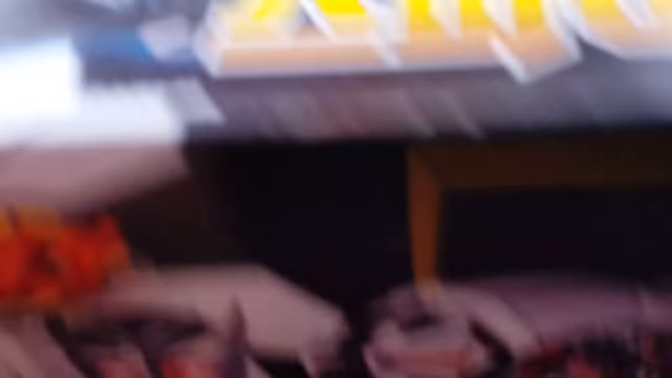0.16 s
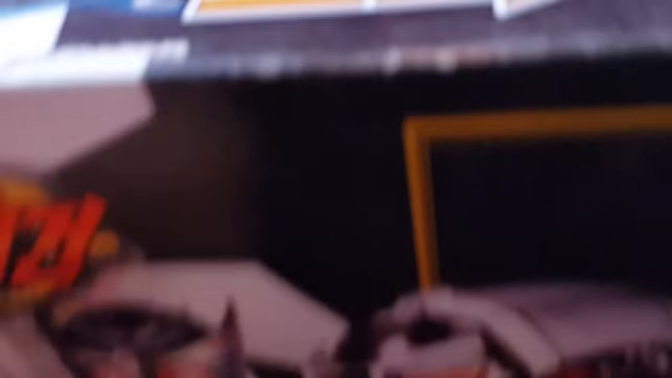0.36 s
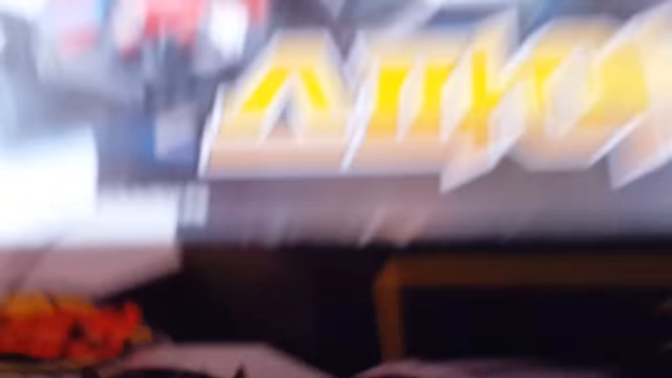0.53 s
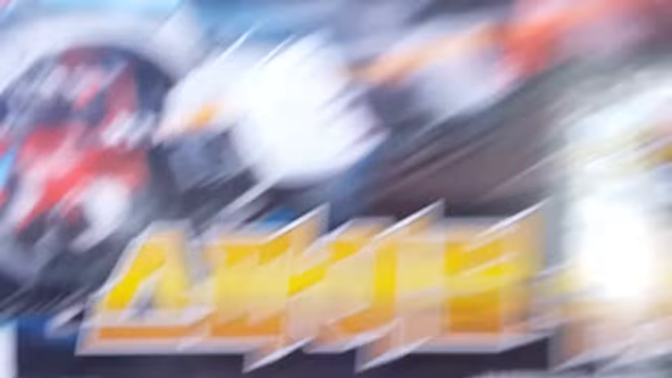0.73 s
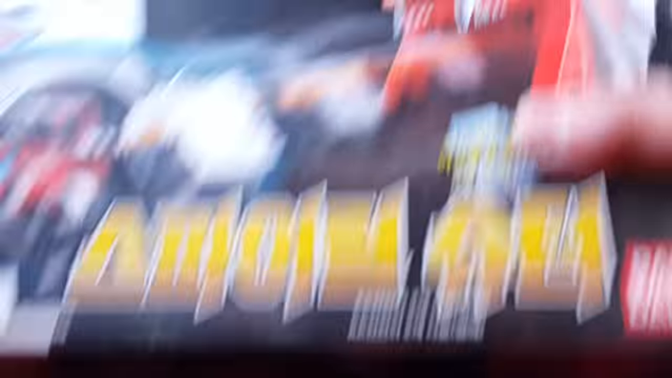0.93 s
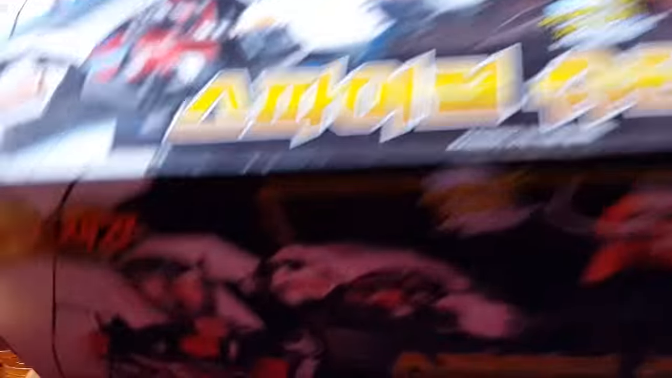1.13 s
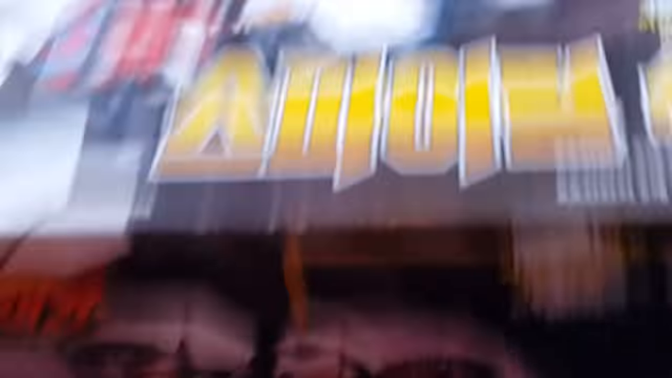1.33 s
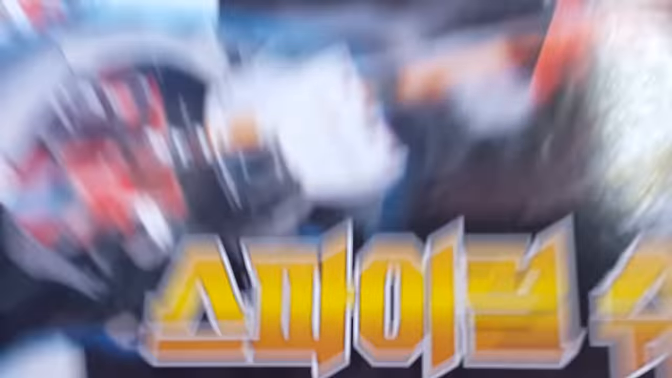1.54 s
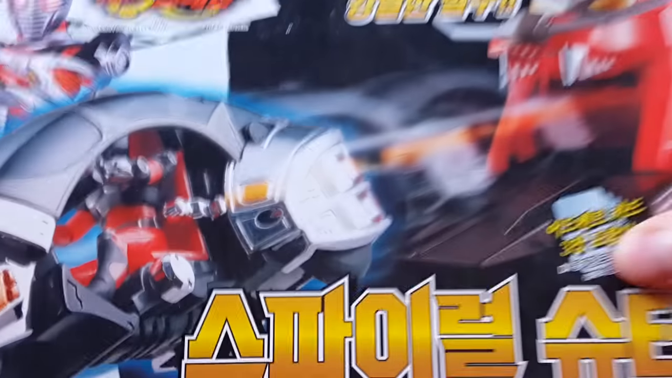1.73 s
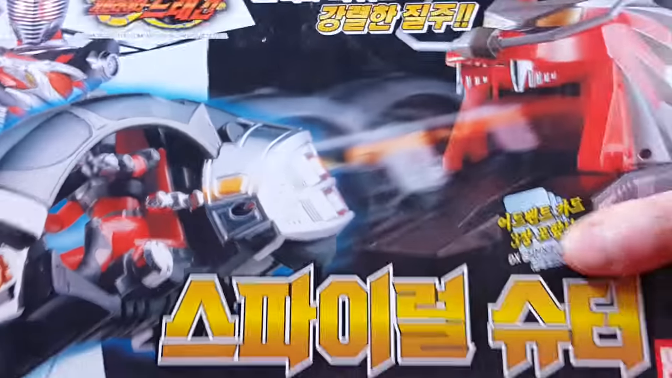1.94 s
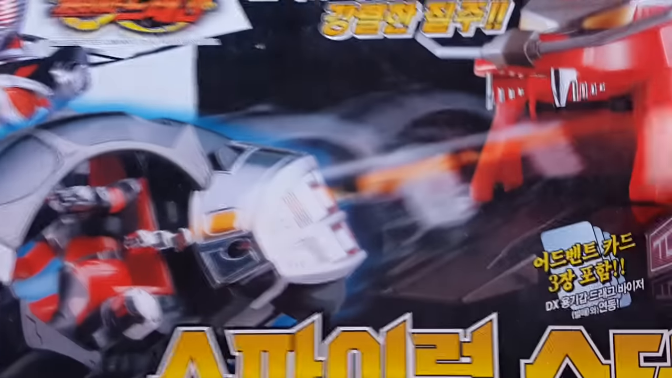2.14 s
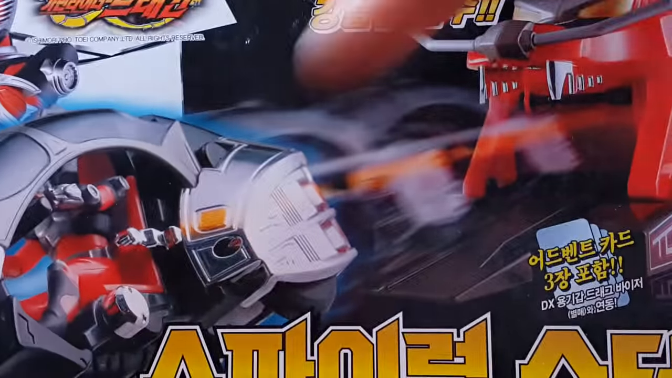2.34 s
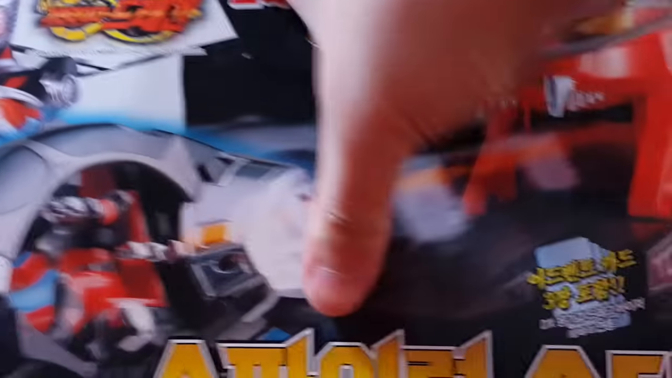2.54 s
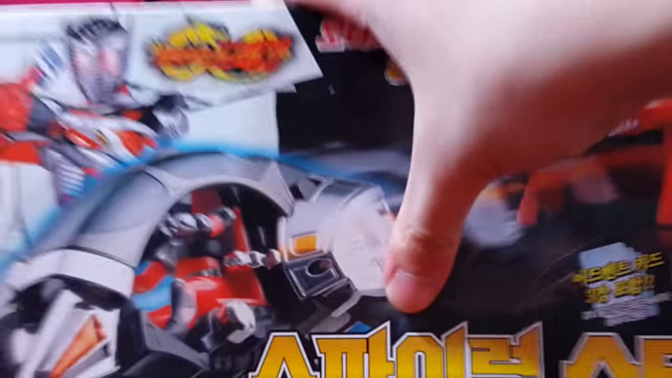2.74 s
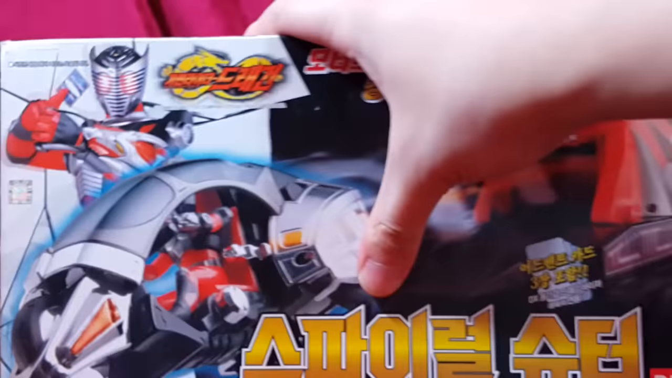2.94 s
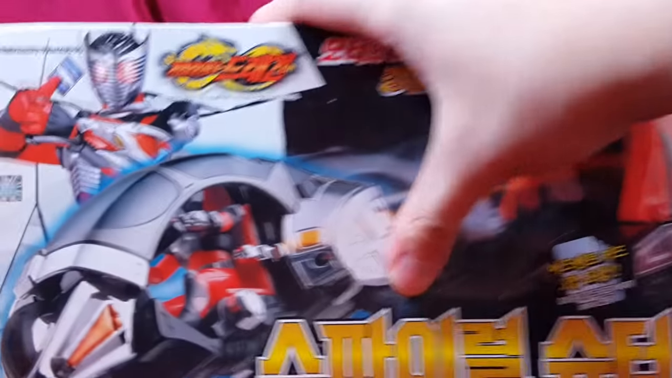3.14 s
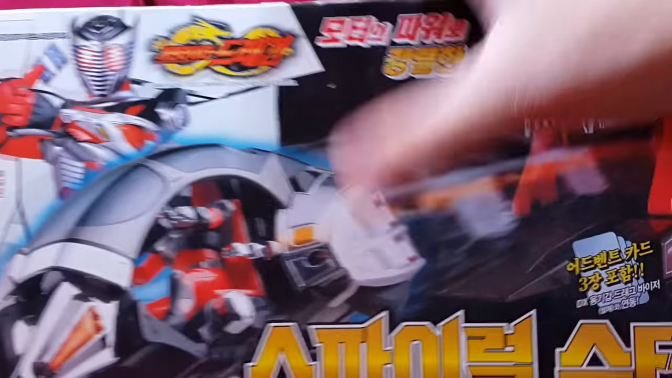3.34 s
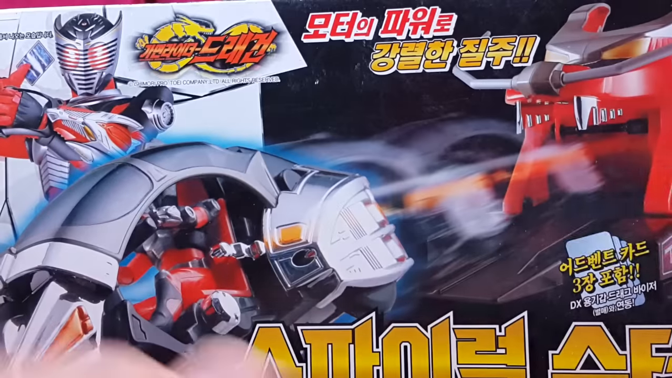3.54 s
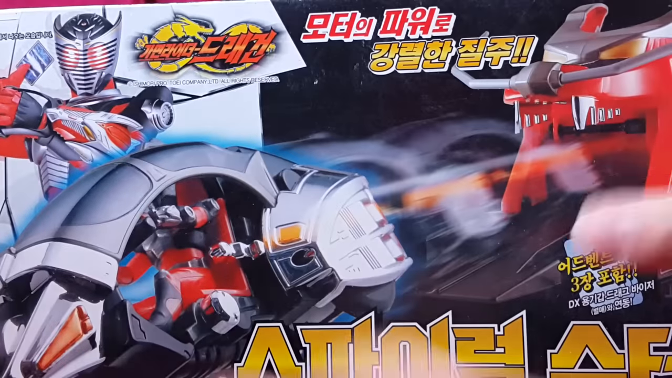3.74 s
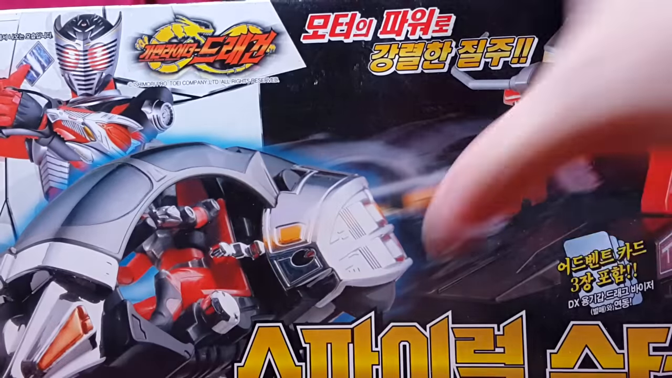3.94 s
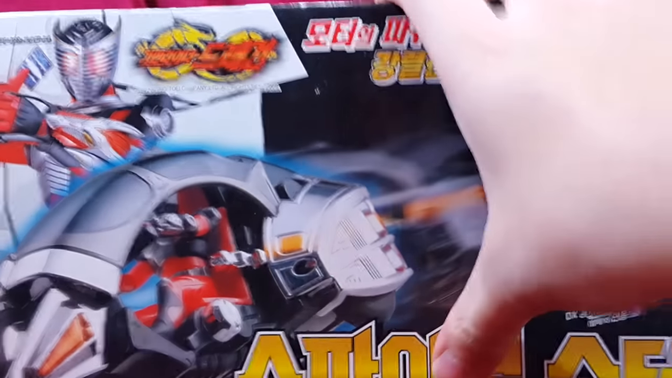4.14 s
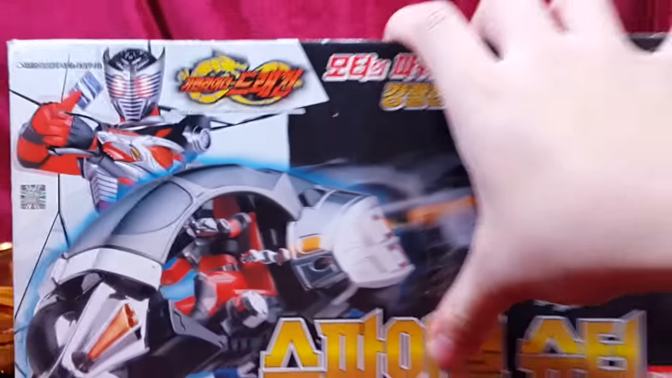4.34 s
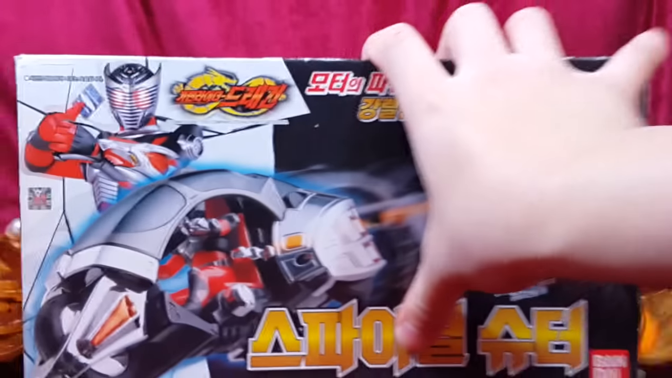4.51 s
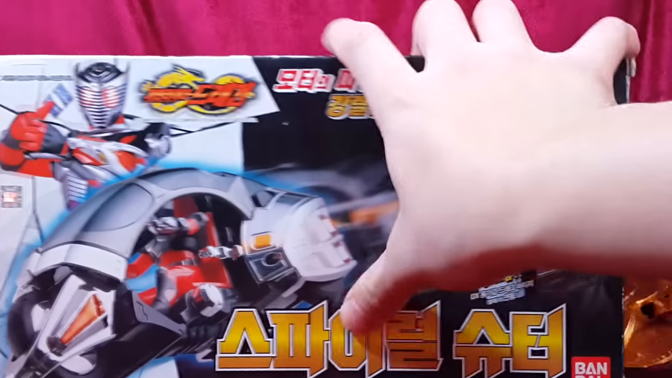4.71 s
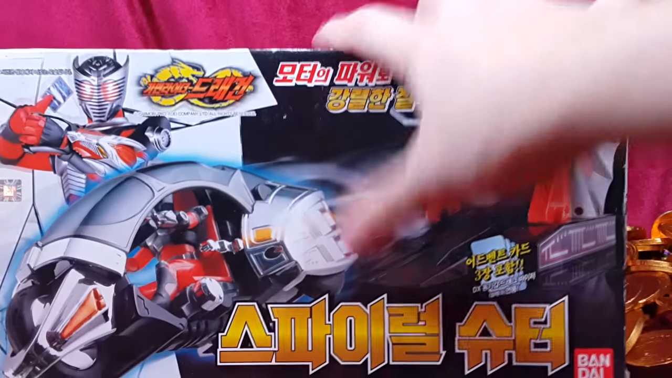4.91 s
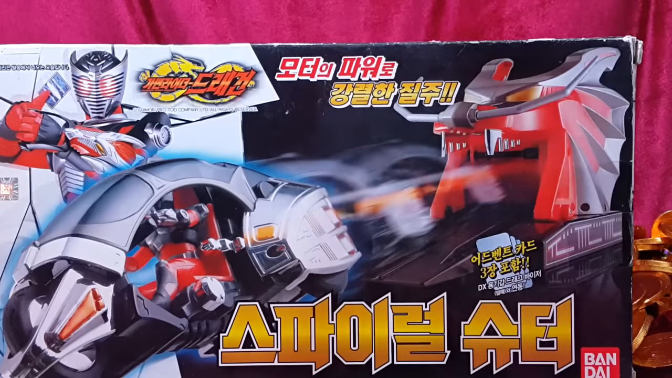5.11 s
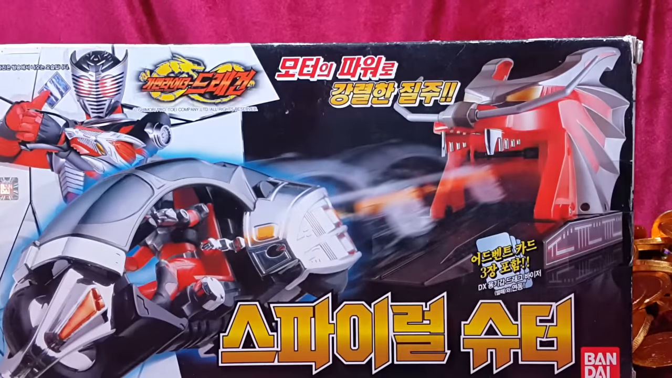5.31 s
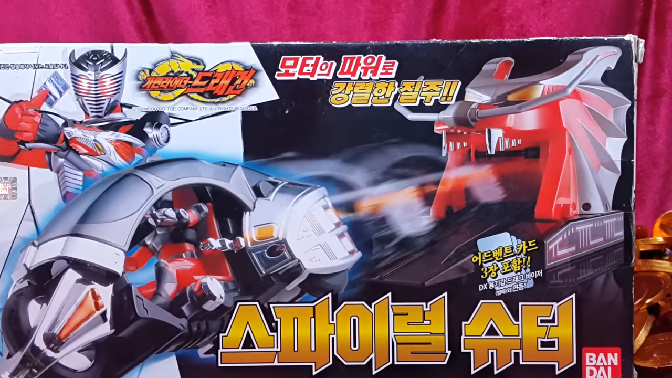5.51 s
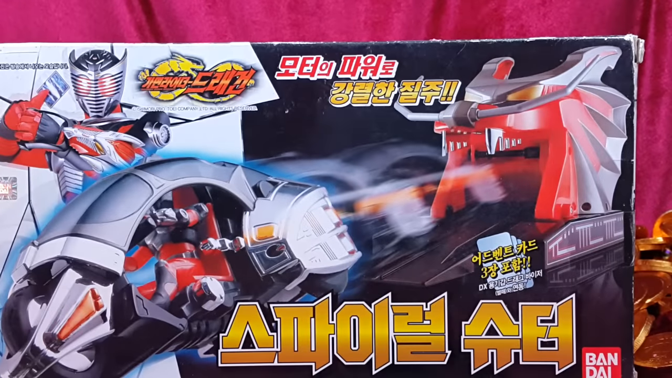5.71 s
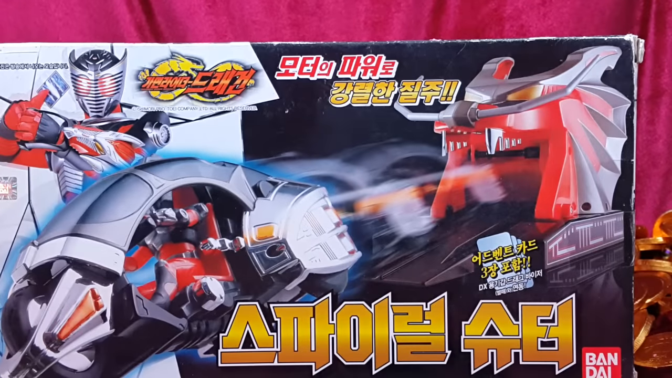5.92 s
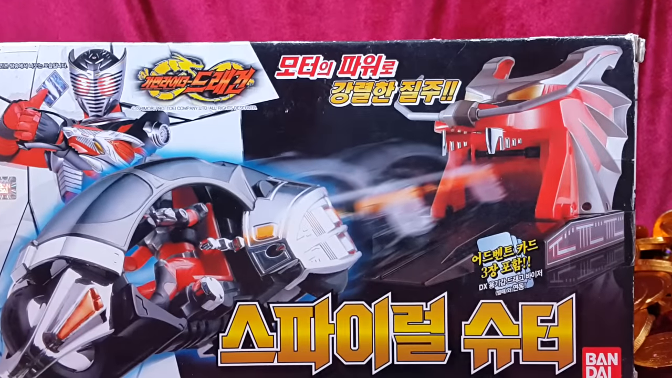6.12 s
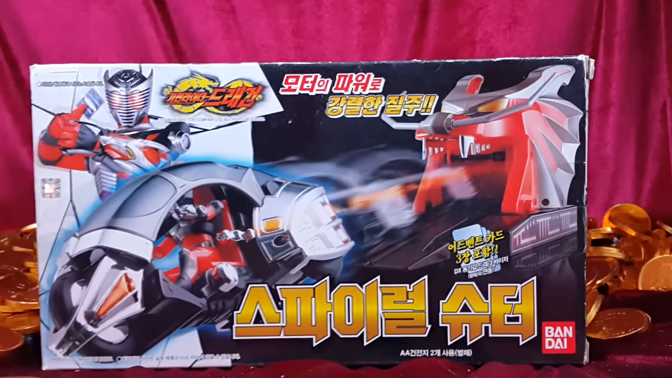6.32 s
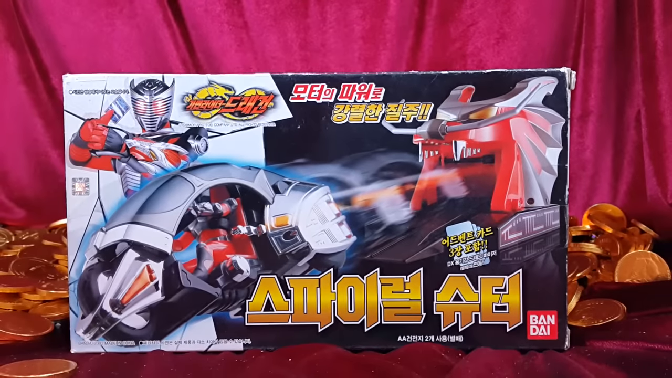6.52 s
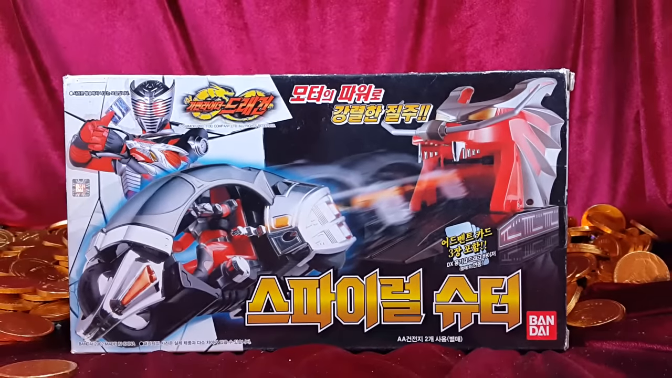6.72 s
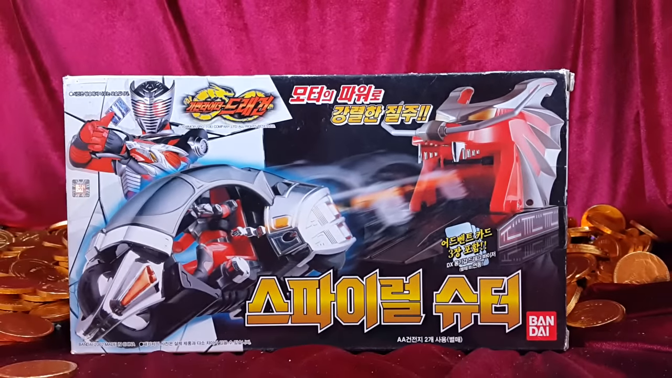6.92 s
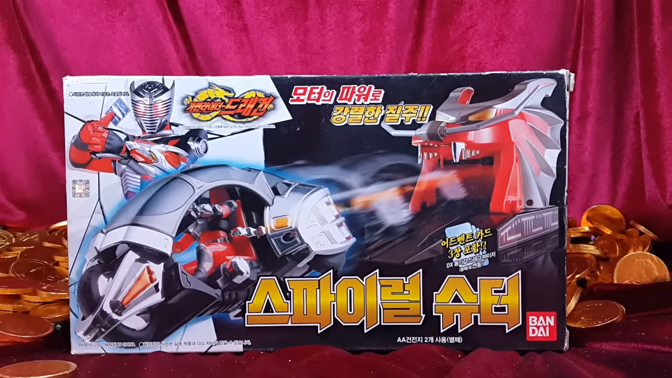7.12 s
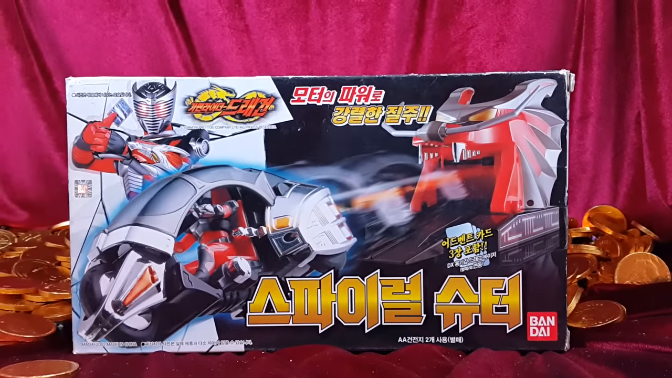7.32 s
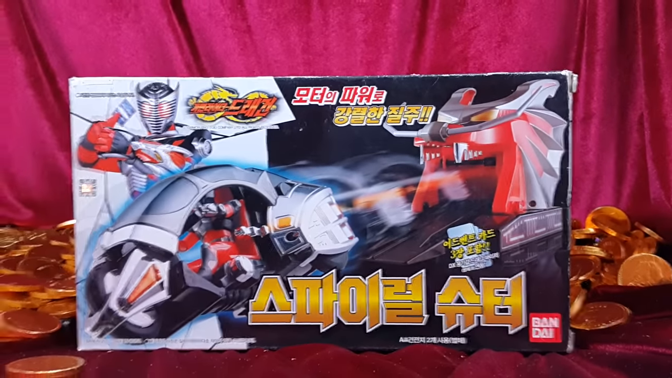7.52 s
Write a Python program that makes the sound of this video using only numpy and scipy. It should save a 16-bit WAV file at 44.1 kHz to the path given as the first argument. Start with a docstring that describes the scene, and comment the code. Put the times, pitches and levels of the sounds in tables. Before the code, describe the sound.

In a quiet, damped room, a hollow cardboard box is moved by hand on a cloth-covered table among loose coins, heard by a close stereo microphone. A sharp hollow knock comes at 0.17 seconds, followed by a soft slide and light taps. From 0.6 to 1.4 the box scrapes strongly, with rumbling panels, wall knocks and thin coin ticks. A deep, heavy thud lands at 1.5, then quick bumps and short rubs until 2.1. Lighter touches lead to another cluster at 2.65 to 3.1, with a strong short thud at 2.9. Softer scrapes and taps follow, with a moderate thump near 3.6 and renewed rubbing with coin clicks from 4.4 to 4.9. A last clear bump comes at 5.1. After 5.4 it is nearly silent: faint room noise, tiny taps near 6.3, delicate clinks at 6.6, and small ticks around 7.4.

```python
"""Quiet, damped room: a hollow cardboard box is dragged, lifted and set down by hand on a cloth-covered table.
Drag: gated noise hisses on the cloth; stick-slip clicks shake panels, walls and loose coins.
Blows: thumps, knocks, coin ticks and clinks of a small hard piece are decaying sines.
Hard contacts add noise cracks; faint noise is the room. Close stereo microphone."""
import sys
import numpy as np
from scipy import signal
from scipy.io import wavfile

SR = 44100
rng = np.random.default_rng(int(sys.argv[2]) if len(sys.argv) > 2 else 0)


def bounce(signal):
    """Save signal as a 16-bit WAV file at the path given by the first command-line argument."""
    frames = np.transpose(np.atleast_2d(signal))
    limited = np.clip(frames, -1, 1)
    pcm = np.round(limited * 32767).astype(np.int16)
    wavfile.write(sys.argv[1], SR, pcm)


N = 333396
LEFT_RIGHT = np.array([[1], [-1]])

# slides of the box or of a hand over it: start_s, length_s, hiss_drive_db, swell_db (to its end),
# tilt_db_per_octave, rumble_drive_db
SLIDES = [(0.0, 0.035, -66.5, 1, 0.5, -58), (0.101, 0.071, -52, 2, 4, -53),
          (0.21, 0.28, -52, -10, -2.5, -42.5), (0.602, 0.12, -46.5, 8.5, 2, -51),
          (0.749, 0.28, -41, 5, -.5, -33.5), (1.103, 0.28, -43.5, -9.5, -1.5, -36),
          (1.422, 0.024, -56, 3.5, 0.5, -44.5), (1.549, 0.027, -48.5, 0.5, -2.5, -38.5),
          (1.634, .13, -51, 11, 2, -49.5), (1.784, 0.12, -42.5, -1, 0, -34.5),
          (1.96, 0.11, -42.5, -4, 0, -38), (2.132, 0.12, -60, 8, -2, -51.5),
          (2.321, 0.028, -44.5, -1, 2.5, -44), (2.422, .16, -61, -1.5, 4, -54.5),
          (2.659, 0.075, -52, -8.5, -1.5, -41.5), (2.753, 0.062, -57, 6.5, 0.5, -46),
          (2.847, 0.087, -41, -2.5, -0.5, -30.5), (2.979, 0.11, -42, 4, 0.5, -39),
          (3.24, 0.078, -53.5, 0, -1.5, -43.5), (3.383, 0.21, -52, 4, 0.5, -46),
          (3.66, 0.058, -60, -4.5, 1, -71), (3.789, .1, -53.5, -9, 0.5, -48.5),
          (3.97, 0.051, -61, -2, 3.5, -71.5), (4.113, 0.13, -61, 7, 3, -63.5),
          (4.32, 0.055, -60.5, 7, 1, -51), (4.404, 0.14, -43, -2, 0, -35), (4.579, 0.11, -44, 2, -1.5, -36),
          (4.753, .17, -50, 1.5, -1, -45.5), (4.999, 0.24, -57.5, 4, -1, -51.5),
          (5.292, 0.052, -60, -7.5, 1, -56.5), (6.88, .05, -66, -5, 3.5, -72),
          (7.095, 0.087, -59.5, 0, 3.5, -94), (7.314, 0.19, -70.5, 3, 2, -71.5)]
# box panels and cavity: mode_hz, level_db, t60_s
PANEL_MODES = [(77.4, -4, 0.091), (95.5, -2, 0.093), (113.1, 2.5, 0.055), (136, 0, 0.044), (149, 1, 0.07),
               (177, -2.5, 0.12), (207.6, 3.5, 0.044), (239.1, -0.5, 0.14), (265.5, 1, 0.13),
               (293, -2, 0.14), (410, -15.5, 0.038)]
# box walls: mode_hz, level_db, t60_s
WALL_MODES = [(459, 1, 0.04), (544, -1, 0.032), (650.2, -1, 0.034), (740, 0.5, 0.015), (843.4, 1, 0.0245),
              (934, 1, 0.027), (1083, 0.5, 0.015), (1393, -3, 0.022), (1505, -7, 0.054), (1748, 2, 0.013),
              (2050, 3, .015), (2326, -2.5, 0.017), (3065, -4, 0.005)]
# light coins: mode_hz, level_db, t60_s
COIN_MODES = [(3040, 1, 0.0085), (3375, -1.5, 0.0088), (3880, -3, 0.006), (4446, -6.5, 0.0043),
              (5000, -5.5, 0.0027), (5550, -6.5, 0.0035), (6400, -5, 0.011), (6770, -1.5, 0.0048),
              (7420, -12.5, 0.0038), (8310, 6, 0.005), (8730, -7.5, 0.0023), (9110, -5, 0.0023),
              (10400, 0, 0.0072), (10800, -0.5, .004), (11800, -5.5, .004), (14700, -9, .003)]
# hard knocks on the walls: start_s, peak_db, crack_drive_db, pitch_hz
WALL_KNOCKS = [(0.031, -35, -51.5, 535), (0.1, -35, -50, 530), (0.138, -44, -48, 619),
               (0.1697, -19.5, -24.5, 2670), (0.172, -11.5, -30, 596), (0.182, -15, -29.5, 560),
               (0.201, -41, -40, 802), (0.227, -28, -45, 580), (0.272, -29.5, -44, 721),
               (0.295, -32.5, -50, 668), (0.389, -33, -44.5, 684), (0.469, -31, -43, 840),
               (0.522, -42, -58, 800), (0.68, -34, -49, 600), (0.696, -22, -41, 860),
               (0.716, -22, -31, 970), (0.748, -23, -30.5, 950), (0.759, -21, -34.5, 800),
               (0.848, -27, -49, 816), (0.874, -23, -57, 910), (0.993, -17, -29, 810),
               (1.029, -21.5, -35, 745), (1.277, -42, -40, 1980), (1.363, -32, -41.5, 553),
               (1.528, -20, -38, 577), (1.581, -28, -60, 931), (1.617, -20.5, -42.5, 690),
               (1.67, -32, -60, 920), (1.732, -17, -52, 780), (1.749, -28, -37, 1920),
               (1.769, -18.5, -38, 820), (1.782, -18.5, -35, 720), (1.803, -18, -31.5, 775),
               (1.884, -26, -40, 880), (1.909, -29, -56, 845), (1.95, -28.5, -45, 974),
               (1.968, -33, -52, 896), (2.043, -27, -42, 590), (2.24, -34, -60, 1060),
               (2.293, -30, -58, 510), (2.361, -28, -51, 660), (2.556, -34, -46, 644),
               (2.638, -32, -45, 1660), (2.646, -25, -36, 590), (2.821, -26, -48, 870),
               (2.846, -19.5, -49, 960), (2.865, -20, -29.5, 1500), (2.872, -23.5, -38.5, 470),
               (2.914, -17, -53, 556), (3.03, -28, -35.5, 1110), (3.145, -32, -43, 520),
               (3.362, -34.5, -63, 725), (3.463, -31, -42.5, 625), (3.574, -49, -44, 590),
               (3.654, -35, -58, 634), (3.79, -37, -52, 1460), (3.819, -41, -52, 1100),
               (4.076, -49.5, -62, 1030), (4.124, -62, -55, 2580), (4.212, -32.5, -46.5, 630),
               (4.318, -27.5, -41.5, 560), (4.329, -28, -38, 685), (4.39, -32, -52, 867),
               (4.411, -25, -39, 676), (4.437, -26, -32, 930), (4.667, -24.5, -41, 950),
               (4.709, -33, -34.5, 921), (4.743, -27.5, -35.5, 810), (4.9, -36, -43, 860),
               (4.995, -35.5, -56, 639), (5.136, -27, -44, 560), (5.216, -39, -50, 530),
               (5.495, -60, -71.5, 2050), (5.597, -58, -68.5, 1723), (6.266, -43, -60.5, 579),
               (6.902, -61, -70, 700), (7.006, -48.5, -70, 1000), (7.055, -58, -72, 600),
               (7.403, -40, -62, 543), (7.452, -45, -63, 643), (7.495, -48.5, -69, 937)]
# coins tick against each other: start_s, peak_db, pitch_hz
COIN_TICKS = [(0.001, -31.5, 3430), (0.466, -36, 7200), (0.476, -40, 7750), (0.746, -40, 4510),
              (1.0104, -30, 4670), (1.059, -24, 8300), (1.0674, -27, 8300), (1.2323, -35, 4490),
              (1.2795, -29.5, 4330), (1.3633, -35, 6200), (1.3894, -43, 8150), (1.437, -42, 6580),
              (1.4738, -31, 4750), (2.5567, -44.5, 4960), (2.644, -38, 4430), (3.245, -41, 5600),
              (3.774, -52.5, 7930), (3.786, -45, 6100), (4.3181, -44, 4340), (4.5241, -27.5, 4910),
              (4.591, -32.5, 7750), (4.6314, -35, 7100), (4.6697, -28, 5430), (4.84, -37, 3100),
              (4.961, -38, 3100), (5.2944, -59, 4890), (5.301, -58, 6700), (5.3413, -50, 6540),
              (5.3544, -59, 8100), (6.2647, -45.5, 4200), (6.6268, -62.5, 7800), (7.3562, -58, 9230),
              (7.3923, -44, 4300), (7.4463, -46.5, 4750), (7.455, -52, 7780), (7.497, -42.5, 9400)]
# a small hard piece settles and rings: start_s, peak_db, pitch_hz
PIECE_CLINKS = [(6.559, -49, 1490), (6.594, -51, 2440), (6.6086, -52, 1495), (7.3676, -52.5, 1480),
                (7.5, -42.5, 3350)]


def from_db(db):
    """Decibels to gain."""
    return 10 ** (np.asarray(db) / 20)


def rms_one(x):
    """Scales to an rms of 1."""
    return x / np.sqrt(np.mean(x ** 2) + 1e-20)


def at_hz(points, hz):
    """Reads a (Hz, value) table on a log frequency axis."""
    points_hz, values = np.array(points).T
    return np.interp(np.log(hz), np.log(points_hz), values)


def per_sample(per_ms):
    """Interpolates one value a millisecond to one a sample."""
    return np.interp(np.arange(N) / SR * 1000, np.arange(len(per_ms)), per_ms)


def drift(corner_hz):
    """Slow chance: noise at every 40th sample through a double one-pole low-pass; rms 1 before interpolation."""
    step, settle = 40, 2000
    pole = np.exp(-2 * np.pi * step * corner_hz / SR)
    white = rng.standard_normal(N // step + settle + 2)
    slow = signal.lfilter([1], [1, -2 * pole, pole * pole], white)[settle:]
    return np.interp(np.arange(N) / step, np.arange(len(slow)), rms_one(slow))


def ring(clicks, hz, t60_s):
    """Two-pole resonator: a unit click sets a decaying sine of height 1 ringing."""
    radius = from_db(-60 / (t60_s * SR))
    angle = 2 * np.pi * hz / SR
    # the tiny offset avoids denormals
    return signal.lfilter([0, np.sin(angle)], [1, -2 * radius * np.cos(angle), radius * radius], clicks + 1e-18)


def to_ports(mid, side, hz, leaning=1):
    """Both microphone ports hear the lows alike, the highs each in its own way."""
    # hz, left_right_likeness
    likeness = [(60, .995), (180, .97), (350, .8), (750, .68), (1300, .05), (2400, 0)]
    # hz, left_minus_right_db
    lean_db = [(60, .7), (180, -.9), (700, .4), (2800, 0), (5600, -2), (9000, -7), (14000, -7)]
    alike = np.clip(at_hz(likeness, hz), 0, 1)
    lean = from_db(leaning * at_hz(lean_db, hz) / 2 * LEFT_RIGHT)
    return lean * (np.sqrt(1 + alike) * mid + np.sqrt(1 - alike) * side * LEFT_RIGHT)


def noise_bands(spectrum, lowest_hz, leaning=1):
    """Yields (centre Hz, stereo noise) in half-octave bands."""
    edges_hz = lowest_hz * 2 ** np.arange(0, np.log2(19000 / lowest_hz), .5)
    white = rng.standard_normal((2, 2, N))      # neighbouring bands get unrelated noise
    for k, (low_hz, high_hz) in enumerate(zip(edges_hz, edges_hz[1:])):
        band_pass = signal.butter(2, [low_hz, high_hz], "band", fs=SR, output="sos")
        mid, side = signal.sosfilt(band_pass, white[k % 2])
        hz = np.sqrt(low_hz * high_hz)
        yield hz, from_db(at_hz(spectrum, hz)) * to_ports(mid, side, hz, leaning)


def hiss(spectrum, lowest_hz, patchy_db, corner_hz, tilt_db=0, leaning=1):
    """Noise bands flicker partly together, partly alone; rms near 1 before a tilt per octave about 8 kHz."""
    together = drift(corner_hz)
    bands = list(noise_bands(spectrum, lowest_hz, leaning))
    size = np.sqrt(sum(np.mean(band ** 2) for _, band in bands))
    out = 0
    for hz, band in bands:
        flicker_db = patchy_db * (together + 0.66 * drift(corner_hz))
        out = out + from_db(flicker_db + tilt_db * np.log2(hz / 8000)) * band
    return out / size


def rubbed(modes, slips_per_s, spread_db, clump_db):
    """Stick and slip: dense uneven clicks, coming in clumps, shake every mode; rms 1."""
    slips = rng.random((2, N)) < slips_per_s / SR
    uneven_db = spread_db * np.minimum(rng.exponential(1, (2, N)), 4)
    slips = slips * from_db(uneven_db + clump_db * drift(25))
    spots = rng.choice([-1, 1], (2, N + len(modes)))
    out = 0
    for k, (hz, level_db, t60_s) in enumerate(modes):
        signs = spots[:, k:k + N]     # each slip happens at another spot
        mid, side = ring(slips * signs, hz, t60_s)
        out = out + from_db(level_db) * to_ports(mid, side, hz)
    return rms_one(out)


def blows(modes, rows, focus_db_per_octave, contact_s, detune):
    """Each blow rings the modes near its pitch most; grip and place shift them a little every time.

    Rows: start_s, peak_db, pitch_hz, t60_s (at the pitch), pan_db (left minus right)."""
    longest_s = max(row[3] for row in rows)
    t = np.arange(int(min(.2, 1.5 * longest_s) * SR)) / SR
    table = np.array(modes)
    mode_hz, mode_db = table[:, :1], table[:, 1:2]
    out = np.zeros((2, N))
    chance = rng.normal(0, 1, (len(rows), 4, len(modes), 1))
    for row, (shift, force, spin, side_spin) in zip(rows, chance):
        start_s, peak_db, pitch_hz, t60_s, pan_db = row
        hz = mode_hz * (1 + detune * shift)
        strength_db = mode_db - focus_db_per_octave * abs(np.log2(hz / pitch_hz)) + 1.5 * force
        mode_t60_s = np.clip(t60_s * (pitch_hz / hz) ** .4, .003, 1)
        decay = from_db(strength_db - 60 * t / mode_t60_s)
        quarter = np.pi / 2 * np.sign(side_spin)     # either port may lead
        mid = decay * np.sin(2 * np.pi * hz * t + .4 * spin)
        side = decay * np.sin(2 * np.pi * hz * t + .4 * spin + quarter)
        wave = sum(to_ports(m, d, f) for m, d, f in zip(mid, side, hz[:, 0]))
        wave = -wave * (1 - np.exp(-t / contact_s)) ** 2     # the contact takes a moment to load the body
        wave = wave / abs(wave.mean(axis=0)).max()
        pan = from_db(np.clip(pan_db, -9, 9) / 2 * LEFT_RIGHT)
        at = round(start_s * SR)
        out[:, at:at + len(t)] += (from_db(peak_db) * pan * wave)[:, :N - at]
    return out


def under_slides(drive_db, fall_db_per_s):
    """One gain per slide and millisecond: it rises, swells or sags over the slide's length and falls."""
    rise_db_per_s = 329.5
    t = np.arange(0, N / SR + .002, .001)
    start_s, length_s, _, swell_db = np.transpose(SLIDES)[:4, :, None]
    swelling_db = swell_db * np.clip((t - start_s) / length_s, 0, 1)
    rising_db = rise_db_per_s * np.maximum(start_s - t, 0)
    falling_db = fall_db_per_s * np.maximum(t - start_s - length_s, 0)
    return from_db(drive_db[:, None] + swelling_db - rising_db - falling_db)


def drag():
    """Every slide hisses on the cloth, shifts the coins, scrapes the walls and shakes the panels."""
    # hz, level_db_per_hz (relative)
    cloth_spectrum = [(530, -30), (900, 0), (991, -15.5), (1080, -9.5), (1170, -2), (1470, -10.5),
                      (2300, -6), (4010, -10), (4520, -11), (7060, -15), (7960, -13.5), (14500, -23),
                      (16000, -27)]
    _, _, hiss_drive_db, _, tilts_db, rumble_drive_db = np.transpose(SLIDES)
    each = under_slides(hiss_drive_db, fall_db_per_s=218.5)
    speed = per_sample(each.sum(axis=0)) + 1e-9
    # the panels shake on a little longer
    shaking = per_sample(under_slides(rumble_drive_db, fall_db_per_s=125.5).sum(axis=0))
    tilt_db = per_sample(tilts_db @ each) / speed
    cloth = from_db(4.5) * hiss(cloth_spectrum, 1050, patchy_db=1.72, corner_hz=13, tilt_db=tilt_db)
    crackle = from_db(-9.5) * rubbed(COIN_MODES, 720, spread_db=4.0, clump_db=-1.5)
    scrape_share = .45     # the wall scrape lies between rumble and hiss
    scraping = from_db(-1) * speed ** scrape_share * shaking ** (1 - scrape_share)
    rumble = shaking * rubbed(PANEL_MODES, 600, spread_db=1.5, clump_db=2.0)
    scrape = scraping * rubbed(WALL_MODES, 500, spread_db=2.5, clump_db=1.5)
    return rumble, scrape + speed * (cloth + crackle)


def thumps():
    """Soft blows of hand and table shake the large panels, unpanned."""
    # start_s, peak_db, pitch_hz, t60_s (short where the hand stays on)
    soft_blows = [(0.026, -32.5, 174, 0.093), (0.17, -15, 248, 0.072), (0.183, -14.5, 80, 0.067),
                  (0.271, -37, 250, 0.054), (0.289, -28.5, 238, 0.04), (0.385, -35, 235, 0.038),
                  (0.464, -32, 240, 0.067), (0.707, -22.5, 265, 0.11), (0.749, -22, 97, 0.12),
                  (1.373, -25.5, 148, 0.047), (1.413, -29, 162, .035), (1.526, -3.5, 110, 0.077),
                  (1.621, -20, 96.9, 0.065), (1.734, -13.5, 190, 0.18), (1.767, -30, 210, 0.17),
                  (1.8, -21.5, 230, 0.085), (2.039, -20, 184, 0.066), (2.1, -28.5, 121, 0.043),
                  (2.552, -29.5, 183, 0.041), (2.633, -32, 200, 0.064), (2.649, -18, 274, 0.085),
                  (2.845, -15, 263, 0.099), (2.871, -33, 215, 0.087), (2.915, -4, 120, 0.039),
                  (2.955, -25, 200, .06), (3.508, -24.5, 182, 0.053), (3.573, -18, 221, 0.029),
                  (3.615, -37, 180, .04), (3.797, -34.5, 154, 0.15), (3.95, -46.5, 99, 0.092),
                  (4.212, -29, 83, 0.18), (4.324, -24, 84, 0.053), (4.376, -26.5, 200, 0.044),
                  (4.41, -21, 286, 0.16), (4.666, -26, 277, 0.066), (4.738, -24.5, 272, 0.057),
                  (4.933, -34, 260, 0.15), (5.128, -23.5, 262, 0.084), (5.282, -46, 242, 0.071),
                  (6.263, -52.5, 160, 0.031), (6.551, -46, 180, .07), (6.61, -54, 160, .06),
                  (6.88, -62.5, 197, .1), (7.37, -51, 193, .1), (7.401, -51, 215, 0.11),
                  (7.447, -53.5, 118, 0.12), (7.501, -52, 228, 0.072)]
    rows = np.pad(soft_blows, [(0, 0), (0, 1)])     # pan 0 dB
    return blows(PANEL_MODES, rows, focus_db_per_octave=13.0, contact_s=0.0043, detune=0.042)


def knocks():
    """Hard knocks ring the walls briefly, stronger ones longer."""
    middling_t60_s, longer_per_db, pan_spread_db = .06, 0.0376, 3.5
    middling_db = np.median([peak_db for _, peak_db, _, _ in WALL_KNOCKS])
    rows = []
    for start_s, peak_db, _, pitch_hz in WALL_KNOCKS:
        t60_s = middling_t60_s * np.exp(longer_per_db * (peak_db - middling_db))
        rows.append((start_s, peak_db, pitch_hz, t60_s, pan_spread_db * rng.normal()))
    return blows(WALL_MODES, rows, focus_db_per_octave=13.0, contact_s=0.00021, detune=0.054)


def cracks():
    """Every hard contact starts with a snap and a crack of noise that dies faster in the treble."""
    # hz, level_db_per_hz (relative)
    crack_spectrum = [(1500, 1.5), (3000, 1.5), (5000, -9.5), (8000, -18.5), (12000, -25), (16000, -12)]
    small_drive_db = -15.5     # ticks and clinks, relative to their peak
    contacts = [(start_s, drive_db) for start_s, _, drive_db, _ in WALL_KNOCKS]
    contacts += [(start_s, peak_db + small_drive_db) for start_s, peak_db, _ in COIN_TICKS + PIECE_CLINKS]
    start_s, drive_db = np.transpose(contacts)
    starts = np.full(N, 1e-18)
    starts[np.round(start_s * SR).astype(int)] = from_db(drive_db)
    snap_t60_s = 0.008
    snap = signal.lfilter([1], [1, -from_db(-60 / (SR * snap_t60_s))], starts)
    out = 0
    for hz, band in noise_bands(crack_spectrum, 1055):
        crack_t60_s = 0.044 * (3000 / hz) ** .9
        crack = signal.lfilter([1], [1, -from_db(-60 / (SR * crack_t60_s))], starts)
        out = out + from_db(6.5) * band * (snap + crack)
    return out


def ticks():
    """Coins tick against each other: short, high rings scattered left and right."""
    t60_s, pan_spread_db = 0.019, 4
    rows = [(*row, t60_s, pan_spread_db * rng.normal()) for row in COIN_TICKS]
    return blows(COIN_MODES, rows, focus_db_per_octave=16.5, contact_s=.0001, detune=0.053)


def clinks():
    """A small hard piece rings to the right, shorter at higher pitch."""
    # mode_hz, level_db, t60_s
    piece_modes = [(1478, -7, .06), (2490, -0.5, .04), (3337, 5.5, .04), (4140, 10, .03)]
    t60_at_1500_hz_s, pan_db = 0.063, -3
    rows = [(start_s, peak_db, pitch_hz, t60_at_1500_hz_s * 1500 / pitch_hz, pan_db)
            for start_s, peak_db, pitch_hz in PIECE_CLINKS]
    return blows(piece_modes, rows, focus_db_per_octave=24.0, contact_s=0.00012, detune=0.0037)


def room():
    """Still room: faint, slightly flickering noise without left-right lean."""
    # hz, level_db_per_hz (relative)
    room_spectrum = [(18, -30.5), (30, -4), (53, -3.5), (157, -6.5), (239, -4), (345, -12), (473, -12.5),
                     (512, -19), (649, -11.5), (844, -17.5), (1010, -14.5), (4190, -19.5), (5900, -27),
                     (12000, -19.5), (16000, -21.5)]
    return from_db(-67.5) * hiss(room_spectrum, 24, patchy_db=.3, corner_hz=5, leaning=0)


def scene():
    """Drag, blows and the still room."""
    rumble, rubbing = drag()
    no_deep_bass = signal.butter(2, 62, "high", fs=SR, output="sos")     # small panels radiate none
    panels = signal.sosfilt(no_deep_bass, rumble + thumps())
    return panels + rubbing + knocks() + cracks() + ticks() + clinks() + room()


def record(dry):
    """The microphone rolls off the deepest bass and has a small treble peak; the top is cut steeply."""
    low_cut = signal.butter(2, 42, "high", fs=SR, output="sos")
    light = signal.sosfilt(low_cut, dry)
    peak_b, peak_a = signal.iirpeak(8200, 7.0, fs=SR)
    peaked = light + 0.29 * signal.lfilter(peak_b, peak_a, light)
    top_cut = signal.cheby2(16, 60, 16150, fs=SR, output="sos")     # 60 dB down from 16150 Hz
    return signal.sosfilt(top_cut, peaked)


dry = scene()
out = record(dry)
bounce(out)
```